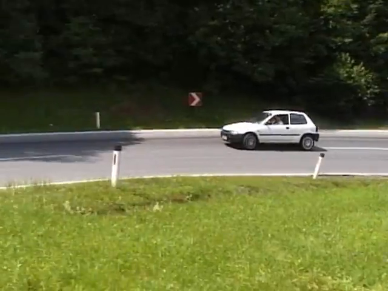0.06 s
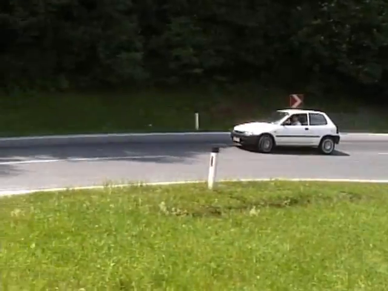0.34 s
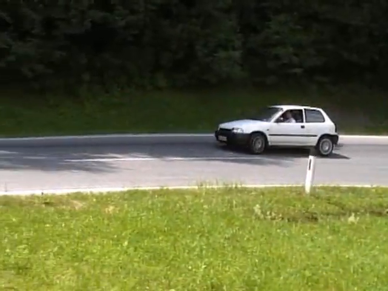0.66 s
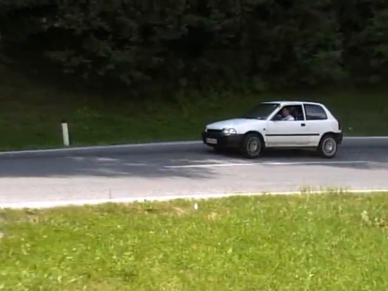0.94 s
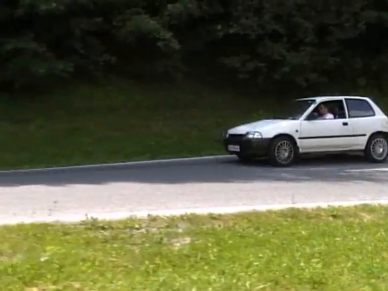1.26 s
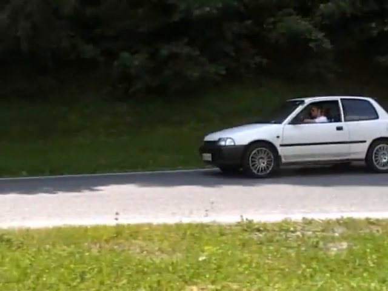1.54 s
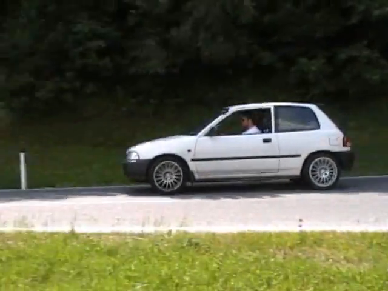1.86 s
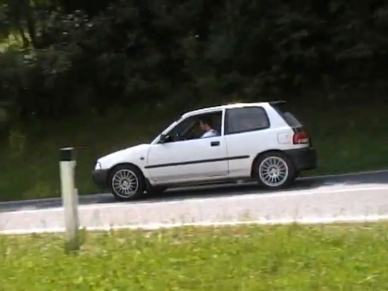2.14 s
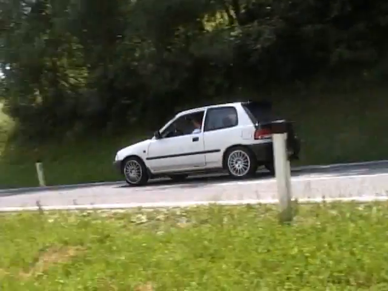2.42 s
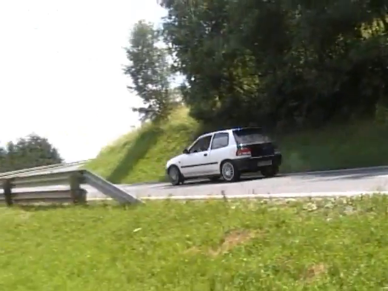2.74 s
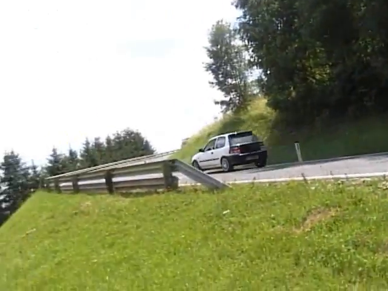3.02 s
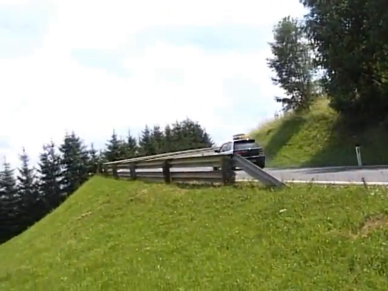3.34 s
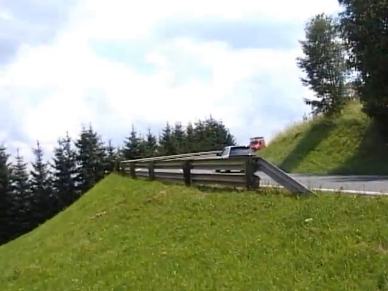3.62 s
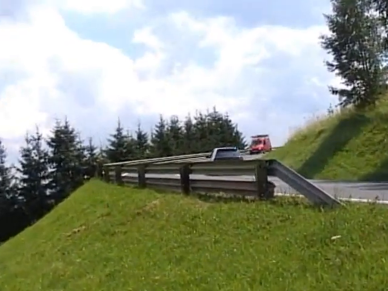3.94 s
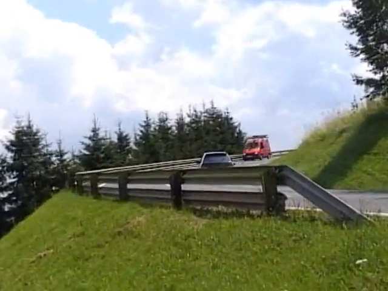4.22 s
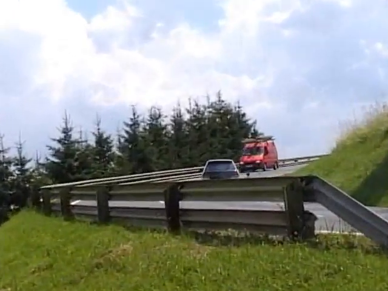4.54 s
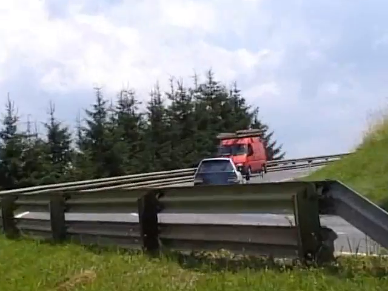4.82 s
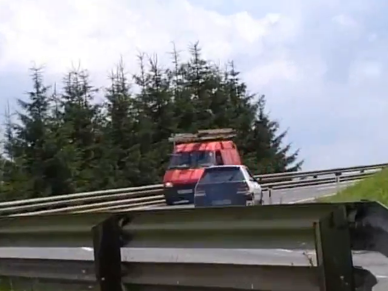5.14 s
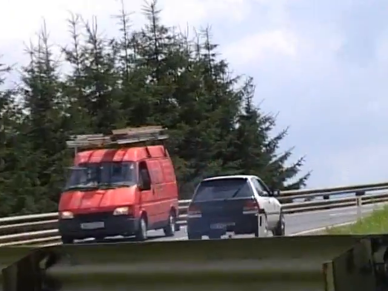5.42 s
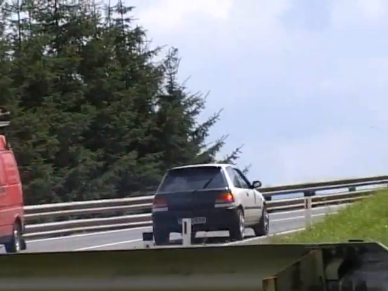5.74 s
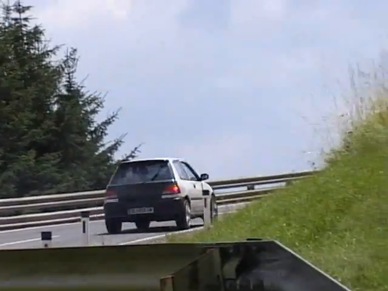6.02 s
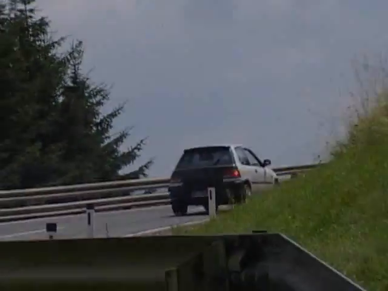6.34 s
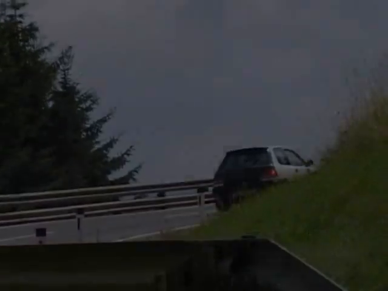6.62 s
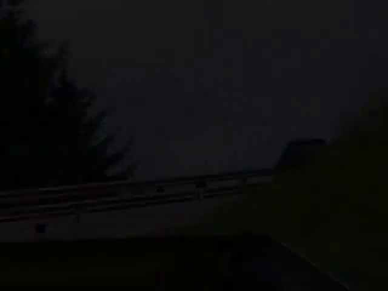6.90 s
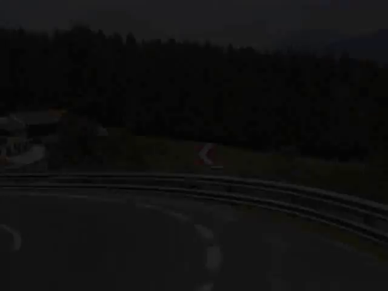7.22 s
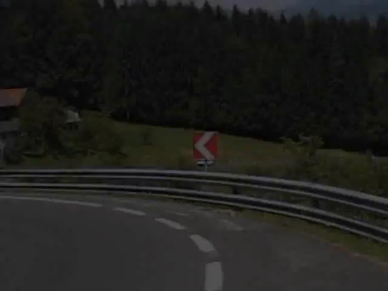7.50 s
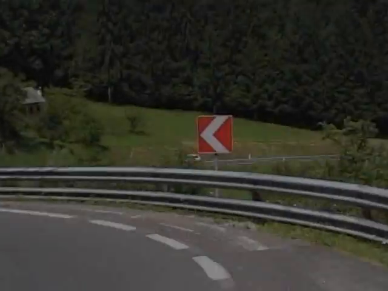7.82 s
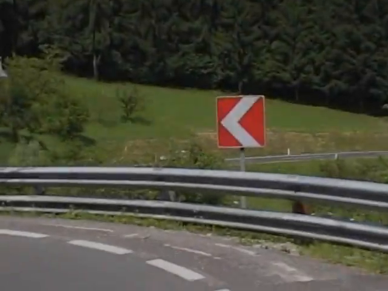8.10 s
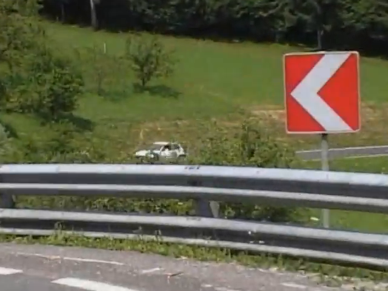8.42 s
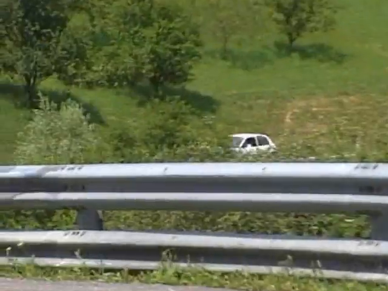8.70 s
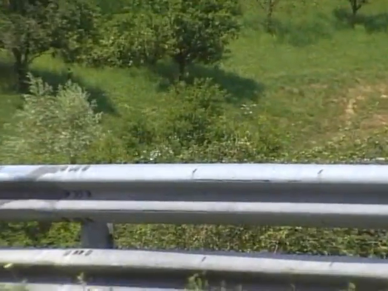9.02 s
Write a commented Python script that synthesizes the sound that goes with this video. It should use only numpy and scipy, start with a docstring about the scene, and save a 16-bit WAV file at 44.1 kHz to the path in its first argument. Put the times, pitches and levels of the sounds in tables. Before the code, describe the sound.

Tyres squeal, then a small car passes with a booming exhaust; wind buffets the microphone and distant traffic fades away.

```python
"""A small hatchback takes a mountain hairpin hard: its tyres stick and slip, squealing and spitting grit.
It pulls past uphill at 2.3 s, exhaust booming and tyres roaring; gusts buffet the microphone of a tape
camcorder, whose case ticks. Traffic drones higher up, the driver lifts off, and a van goes by at 5.5 s.
All fades out by 7.1 s and comes back on the quiet valley: faint chirps, an engine slowing far away.
Throughout, the camcorder's tape drive whines faintly and its hum filter combs the sound."""
import sys
import numpy as np
from scipy import signal
from scipy.fft import rfft, irfft, next_fast_len
from scipy.io import wavfile
from scipy.ndimage import uniform_filter1d, minimum_filter1d, map_coordinates

SR = 44100
rng = np.random.default_rng(int(sys.argv[2]) if len(sys.argv) > 2 else 0)


def unload_audio(sound):
    """Save the sound as a 16-bit wav file, at the path given as the first command line argument."""
    columns = np.transpose(np.atleast_2d(sound))
    # keep every value between -1 and 1, then stretch to whole-number steps
    steps = np.round(np.clip(columns, -1, 1) * 32767)
    wavfile.write(sys.argv[1], SR, steps.astype(np.int16))


N = 399546
T = np.arange(N) / SR


# slides of the loaded tyre, each ended by a moment of grip: (start [s], length [s], first pitch [Hz],
# last pitch [Hz], tone level [dB], octave level [dB], roughness [0-1])
TYRE_SLIDES = [(0, .04, 1133, 1137, -15.5, -26, 0.34), (0.048, 0.054, 1125, 1120, -17, -19, 0.6),
               (0.102, 0.043, 1135, 1085, -14.5, -21.5, 0.65),
               (0.148, 0.083, 1122, 1204, -15.5, -23.5, 0.4), (0.244, .04, 1161, 1143, -18.5, -30, 0.35),
               (0.286, 0.045, 1135, 1136, -13.5, -21.5, 0.6), (.365, 0.055, 1174, 1142, -20.5, -40, 0.1),
               (0.446, 0.025, 1112, 1093, -17, -25.5, 0.54), (0.495, .02, 1145, 1134, -17, -17.5, 0.85),
               (.517, 0.047, 1156, 1163, -12.5, -22, 0.3), (0.586, 0.034, 1164, 1172, -12.5, -22, .2),
               (0.644, .075, 1163, 1143, -13.5, -23.5, 0.23), (0.725, .082, 1127, 1132, -14, -23.5, 0.4),
               (.815, .075, 1144, 1128, -17, -20.5, 0.6), (.893, .087, 1140, 1143, -17.5, -22.5, 0.3),
               (0.985, 0.089, 1165, 1186, -16, -25, 0.33), (1.082, 0.045, 1177, 1192, -13, -26, 0.4),
               (1.14, 0.07, 1190, 1182, -20, -33.5, .45), (1.234, .078, 1252, 1230, -23.5, -42, 0.28)]
def slides():
    """Pitch, tone gain, octave gain and roughness: each slide bites, glides and dies as the tread grips."""
    attack_s, release_s = .008, .011
    points, tone_gain, octave_gain = [], 0, 0
    for start, length, first_hz, last_hz, tone_db, octave_db, rough in TYRE_SLIDES:
        points += [(start, first_hz, rough), (start + length, last_hz, rough)]
        attack = np.clip((T - start) / attack_s, 0, 1)
        envelope = attack * np.exp(-np.clip(T - start - length, 0, 1) / release_s)
        tone_gain = np.maximum(tone_gain, undb(tone_db) * envelope)
        octave_gain = np.maximum(octave_gain, undb(octave_db) * envelope)
    hz, rough = curves(sorted(points))
    return hz, tone_gain, octave_gain, rough


def stick_slip(hz, rough, jitter, jitter_rate, flutter_db):
    """Tread sticks and slips: a tone and its octave, shaken in pitch and level by the road's grain."""
    phase = turn(hz * (1 + rough * jitter * walk(jitter_rate) + 0.00447 * walk(69.8)))
    flutter = undb(flutter_db * (0.3 * walk(95) + rough * walk(280)))
    # tread blocks slip slightly out of step, which frays the octave most
    return [unit(flutter * (np.sin(k * phase) + 0.2 * k * rough * walk(330) * np.cos(k * phase)))
            for k in (1, 2)]


# how hard the tyres are pushed sideways: (time [s], load [dB])
CORNERING_LOAD = [(0, 4.5), (.08, 2), (.25, -4), (.32, -2), (.41, -14.5), (.52, 1), (.72, -8.5), (.86, 2.5),
                  (1.1, -8.5), (1.18, -12), (1.32, -21)]
# a more lightly loaded tyre joins in lower at the apex: (time [s], pitch [Hz], level [dB])
LIGHT_TYRE = [(.68, 1015, -50.5), (.79, 1023, -23), (.88, 1041, -26), (1, 1014, -36), (1.1, 1062, -32),
              (1.3, 1078, -50)]
# rubber scrubbing on asphalt: (frequency [Hz], density [dB])
SCRUB_SPECTRUM = [(500, -28.5), (800, -20), (1050, 8.5), (1500, -6.5), (2100, 2.5), (2700, -5),
                  (3400, -9.5), (4300, -19.5), (6000, -35.5)]
def squeal():
    """The loaded tyre sings and a second joins in; side load drives the judder and scrub beneath them."""
    hz, tone_gain, octave_gain, rough = slides()
    load_db, = curves(CORNERING_LOAD)
    # the note wavers and shudders as the tyre hops
    wavering_hz = hz * (1 + .008 * walk(60))
    tone, octave = stick_slip(wavering_hz, rough, jitter=.01, jitter_rate=330, flutter_db=2.6)
    low, low_octave = stick_slip(hz * .945, rough=0.718, jitter=0.05, jitter_rate=470, flutter_db=7.5)
    shudder = unit(undb(1.5 * walk(90)))
    singing = (tone_gain * tone + octave_gain * octave) * shudder
    judder = undb(-24.5 + load_db) * (low_octave + undb(-1.0) * low)
    light_hz, light_db = curves(LIGHT_TYRE)
    light_partials = stick_slip(light_hz, rough=.6, jitter=0.0394, jitter_rate=270, flutter_db=4.0)
    light_tyre = undb(light_db) * sum(light_partials)
    edge_tone, _ = stick_slip(hz * 1.075, rough=.6, jitter=0.023, jitter_rate=200, flutter_db=2.5)
    tread_edge = undb(-15.0) * tone_gain * edge_tone
    scrub = undb(-22 + 0.36 * load_db + 1.75 * walk(120)) * noise(SCRUB_SPECTRUM)
    release = np.interp(T, [1.3, 1.42], [1, 0])
    return hillside((singing + judder + light_tyre + tread_edge + scrub) * release, wet_db=-22, t60=.4)


# spits of grit where the squeal breaks off: (time [s], half width [s], level [dB])
GRIT_SPITS = [(.05, 0.049, -45), (.365, 0.037, -46.5), (.45, 0.016, -40.5), (.5, .03, -50.5)]
def grit():
    """Soft high hiss of grit thrown from the sliding tread."""
    spray = noise([(5500, -11), (7300, -0.5), (8500, -10), (12500, -15)])
    return spray * bursts(GRIT_SPITS) * undb(2 * walk(200))


# swells and dips of the boom, then of its octave: (time [s], half width [s], level change [dB])
BOOM_RIDES = [(.1, 0.073, 5), (.41, 0.088, -4), (.78, 0.075, -2), (1.87, 0.07, -16), (2.21, 0.14, 5),
              (2.53, 0.08, -9), (2.85, 0.17, 3.5), (3.22, 0.086, -5.5), (4.6, .45, 4)]
OCTAVE_RIDES = [(.25, 0.18, -9), (.54, 0.1, 11.5), (.98, 0.46, 8.5), (1.66, 0.35, 16.5), (1.93, .07, -7),
                (2.17, 0.074, 10)]
def exhaust_boom(firing):
    """Exhaust pulses make a clean boom at the firing rate and a weaker octave."""
    boom = undb(-23 + swells(BOOM_RIDES) + 0.54 * walk(13)) * unit(np.sin(firing))
    octave = undb(-37.5 + swells(OCTAVE_RIDES) + 1.6 * walk(12)) * unit(np.sin(2 * firing))
    return boom * passing(rear_db=2.0, falloff=0.91) + octave * passing(rear_db=2.0, falloff=0.7)


# resonances of the exhaust pipe: (frequency [Hz], gain [dB])
PIPE_RESPONSE = [(190, 4), (310, -17.5), (372, 0.5), (385, -5.5), (398, 2.5), (414, -6), (428, 2.5),
                 (470, -3), (520, -5), (545, -5), (578, 9), (600, -1), (614, -12), (624, 0.5), (655, 6),
                 (684, 4.5), (708, -5), (738, -0.5), (820, -8.5), (1400, -3)]
def exhaust_rasp(firing_hz, firing):
    """Overtones of the firing rate climb through the pipe's resonances."""
    rasp = 0
    for k in [1.5, *np.arange(2.5, 10.5, .5)]:
        pipe_db = np.interp(k * firing_hz, *np.transpose(PIPE_RESPONSE))
        uneven_db = -17 * (k % 1 > 0)  # unequal cylinders add weak half orders
        gain = undb(pipe_db + uneven_db + 1.3 * walk(22) + 1.3 * walk(7))
        rasp += gain * np.sin(k * firing + rng.uniform(0, 2 * np.pi) + 0.074 * k * walk(35))
    aim_db = swells([(4.85, 0.28, 5.4)])  # the tailpipe points back down the road
    return undb(-29.5 + aim_db) * unit(rasp) * passing(rear_db=1.0, falloff=0.85, late_s=.05)


# the revs climb, then drop: (time [s], firing rate [Hz])
ENGINE_REVS = [(0, 117.1), (1.14, 122.4), (1.7, 124.7), (2, 126.3), (2.28, 128.7), (2.85, 132),
               (4.56, 144.8), (5.12, 148), (5.55, 120)]
def engine():
    """Four cylinders pull until the driver lifts off at the next bend; gives sound and firing phase."""
    lift_s, lift_db_per_s = 5.12, 33
    firing_hz, = curves(ENGINE_REVS)
    firing = turn(firing_hz * (1 + 0.0029 * walk(40)))
    exhaust = exhaust_boom(firing) + exhaust_rasp(firing_hz, firing)
    throttle = undb(-lift_db_per_s * np.maximum(T - lift_s, 0))
    return pan(exhaust * throttle, left_db=0.55), firing


# the bright top layer of the rolling tyres: (frequency [Hz], density [dB])
HISS_SPECTRUM = [(600, -9), (1300, 9.5), (2200, 6.5), (3000, 5.5), (3750, 6.5), (4150, 0.5), (4850, 0),
                 (5300, -5), (8500, -4), (11500, -8), (14500, -18.5)]
def tyre_hiss(firing):
    """Tyre hiss throbs with the engine and is strongest and brightest close by."""
    hiss = wide(HISS_SPECTRUM, side_db=-20.0) * undb(-28 + .5 * walk(25.22))
    hiss *= passing(rear_db=-0.66, falloff=0.89) * (1 + 0.15 * np.sin(firing))
    sizzle = signal.sosfiltfilt(signal.butter(2, 9000, "high", fs=SR, output="sos"), hiss)
    spread = sizzle + undb(6.0) * (sizzle - sizzle[::-1])  # the top differs more between the capsules
    air_gain = undb(1.0) * passing(rear_db=1.5, falloff=0.53)  # the air takes the top first
    return hiss - sizzle + spread * air_gain


# the body of the rolling tyres: (frequency [Hz], density [dB])
ROAR_SPECTRUM = [(40, -26), (90, -12), (210, 3), (340, -2), (460, -8), (680, 1), (900, 0.5), (1250, -1.5),
                 (1580, 0), (1820, -3.5), (2100, -6), (3000, -13), (5000, -23), (9000, -42.5)]
def rolling_tyres(firing):
    """Tyre roar carries far, and a broad second swell comes with the passing van; a crest screens its treble
    and the hiss."""
    crest_hz = 1510
    pass_by = undb(-23) * passing(rear_db=1.17, falloff=0.89, late_s=0.28)
    van_roar = undb(-32.5) / np.hypot(1, (T - 5.15) / 1.34)
    roar = wide(ROAR_SPECTRUM, side_db=-20.0) * np.hypot(pass_by, van_roar) * undb(0.52 * walk(20))
    body = signal.sosfiltfilt(signal.butter(6, crest_hz, fs=SR, output="sos"), roar)
    treble = roar - body + tyre_hiss(firing)
    crest_db = np.interp(T, [2.9, 3.7, 5.2, 6.3], [0.5, -7.5, -7.0, -5.5])
    bank_db = -2.0 * np.maximum(T - 5.9, 0)  # the roar sinks behind the bank
    return body * undb(bank_db) + treble * undb(crest_db)


# two tread resonances that shift as the car turns: (time [s], centre [Hz], level [dB])
HIGH_GROOVE = [(1.4, 1199, -38), (2.3, 1151, -29.5), (2.72, 1163, -27), (3.2, 1080, -43), (3.8, 1130, -37),
               (4.4, 1116, -57), (5.1, 1119, -41.5), (5.6, 1178, -44), (6.1, 1038, -53), (7.1, 1100, -49)]
LOW_GROOVE = [(1.5, 781, -37.5), (2.1, 759, -35.5), (2.5, 770.6, -28), (2.95, 806, -33.5), (3.25, 748, -47),
              (4.4, 733, -52), (4.85, 788, -35.5), (5.6, 767.7, -37.5), (6.2, 781, -43.5), (7.1, 758, -48)]
def tread_ring():
    """Air pumped through the tread grooves rings, loudest just behind the car."""
    high_hz, high_db = curves(HIGH_GROOVE)
    low_hz, low_db = curves(LOW_GROOVE)
    high = undb(high_db) * resonance(high_hz, width_hz=230)
    return high + undb(low_db) * resonance(low_hz, width_hz=210)


# tyres of the oncoming van: (frequency [Hz], density [dB])
VAN_SPECTRUM = [(500, -4), (900, 5.5), (1250, 5.5), (1600, 5), (2100, -9.5), (3000, -29), (6000, -66.5)]
def van():
    """The van's tyres swell and fade as it comes through the gap in the bank."""
    nearness = 1 / (1 + ((T - 5.55) / 0.23) ** 2)
    return wide(VAN_SPECTRUM, side_db=-22.0) * undb(-26.5 + walk(14)) * nearness


# drone of the climbing traffic: (time [s], pitch [Hz], level [dB])
TRAFFIC_DRONE = [(4.5, 251.5, -34), (4.75, 248.2, -23), (5.08, 245.5, -27), (5.3, 245.6, -42),
                 (6, 246.2, -42.5), (6.5, 241.4, -41), (7.1, 237.3, -42)]
def uphill_traffic():
    """Engines further up the hill: a throbbing tone with a rougher one above it."""
    hz, db = curves(TRAFFIC_DRONE)
    tone = np.sin(turn(hz * (1 + .02 * walk(90)))) * undb(3 * walk(55))
    upper = undb(0.37 * db - 27.5) * resonance(hz * 1.43, width_hz=40)
    fade_in = np.clip(T - 4.4, 0, 1)
    return pan((undb(db) * unit(tone) + upper) * fade_in, left_db=-1)


# the breeze between gusts: (time [s], level [dB])
BREEZE_BED = [(1.6, -54), (2.75, -53), (3.3, -31), (4.4, -36.5), (5.85, -47), (6, -58), (6.3, -42),
              (7, -48)]
# strong gusts: (time [s], half width [s], level [dB])
GUST_HITS = [(2.901, 0.054, -31), (3.47, 0.076, -37.5), (3.71, 0.066, -40.5), (4.02, 0.022, -33),
             (4.32, 0.048, -35.5), (4.71, 0.017, -38), (5.62, 0.093, -35), (5.88, 0.051, -35)]
# wind rumble on the microphone: (frequency [Hz], density [dB])
WIND_SPECTRUM = [(25, -15), (50, -4), (90, 3), (140, 2.5), (220, -4), (400, -11), (600, -14), (1000, -35),
                 (2500, -40)]
def wind():
    """Gusts over an uneven breeze buffet the microphone ports, mostly out of step, the left harder."""
    breeze_db, = curves(BREEZE_BED)
    force = undb(breeze_db + 2.8 * walk(8.8)) + bursts(GUST_HITS)
    common, opposed = (noise(WIND_SPECTRUM) * undb(2.0 * walk(28)) for _ in range(2))
    ports = common + 2 * opposed * np.array([[1], [-1]])
    return pan(ports, left_db=5.0) * force


# ticks of the case: (time [s], dry crack [dB], bright ring [dB], dull knock [dB])
TICK_HITS = [(2.566, -18.5, -45, -45), (2.595, -15, -40, -38), (3.1348, -33, -28, -42),
             (3.1363, -29, -22, -42), (3.314, -27, -45, -28), (3.4856, -30, -35, -29),
             (5.6672, -31, -18.5, -28), (6.4, -41, -52, -36), (7.094, -56, -55.5, -54.5),
             (8.58, -35, -43, -33), (8.8972, -33, -41, -25), (8.9762, -19, -30, -16),
             (8.978, -26, -34, -21.5), (8.983, -33, -41, -24.5)]
# the three layers of a tick: (frequency [Hz], density [dB])
CRACK_SPECTRUM = [(2000, 0), (6000, -2), (11000, -1.5), (14500, -11)]
RING_SPECTRUM = [(3000, -11), (5000, -9), (7400, -17), (9000, 2), (10000, -20), (11000, -2.5), (12500, -25)]
KNOCK_SPECTRUM = [(120, -36), (260, -12), (420, 7), (600, -9), (850, 8), (1300, -5), (2100, 3.5),
                  (3000, -8.5), (3800, 0), (4700, -15), (5700, -1.5), (7500, -25)]
def case_ticks():
    """Dry ticks in the camcorder's case, each a burst that dies in a few milliseconds."""
    crack, ring, knock = noise(CRACK_SPECTRUM), noise(RING_SPECTRUM), noise(KNOCK_SPECTRUM)
    ticks = np.zeros(N)
    age = T[:2000]
    attack = 1 - np.exp(-age / 0.00032)
    for start, crack_db, ring_db, knock_db in TICK_HITS:
        span = slice(int(start * SR), int(start * SR) + len(age))
        ticks[span] += attack * (undb(crack_db) * crack[span] * np.exp(-age / 0.0011)
                                 + undb(ring_db) * ring[span] * np.exp(-age / 0.0024)
                                 + undb(knock_db) * knock[span] * np.exp(-age / 0.0021))
    return pan(ticks, left_db=-7.0)


def bump():
    """A soft hollow bump near the microphone."""
    hollow = np.sin(turn(520 * (1 + 0.048 * walk(150))))
    return pan(hollow * bursts([(3.325, 0.01, -25.5)]), left_db=10)


def far_engine():
    """The low orders of a distant engine that picks up a little, then runs down."""
    shaft_hz = np.interp(T, [7.2, 7.8, 8.2, 9], [16.0, 20.0, 19.5, 15.5])
    phase = turn(shaft_hz * (1 + 0.0062 * walk(25)))
    return undb(-48.5) * unit(sum(undb(2 * walk(11)) * np.sin(k * phase) for k in (4, 5, 6)))


# squeaks, about eight a second: (time [s], level [dB])
CHIRP_HITS = [(7.29, -43), (7.4, -46), (7.51, -47), (7.607, -41), (7.725, -46), (7.838, -44), (7.95, -50),
              (8.07, -44), (8.19, -48), (8.31, -49), (8.44, -46), (8.57, -48)]
def far_chirps():
    """A far squeak, perhaps of tyres: short uneven pulses of one wavering tone."""
    tone = unit(np.sin(turn(1740 * (1 + .03 * walk(350)))))
    return tone * bursts([(time, .016, db) for time, db in CHIRP_HITS])


# the far road's swell: (time [s], level [dB])
ROAD_BED = [(7.2, -37), (8, -41), (8.4, -40.5), (9.05, -42)]
# its colour across the valley: (frequency [Hz], density [dB])
VALLEY_SPECTRUM = [(55, -6), (80, -2), (140, -8), (180, -5), (310, -7), (450, -3), (660, -6.5), (900, -9),
                   (1750, -9.5), (2400, -14.5), (4300, -28), (9000, -58), (13000, -69.5)]
def valley():
    """A bed of far road noise under an engine, chirps, an approaching car and a low hum that dies away."""
    road_db, = curves(ROAD_BED)
    motor, chirps = far_engine(), far_chirps()
    road = wide(VALLEY_SPECTRUM, side_db=-9.0) * undb(road_db + 0.24 * walk(36))
    approach_db = np.interp(T, [8, 8.7], [-58, -45.5])  # the car clears the bushes
    approach = noise([(560, -5), (680, 5.0), (850, -3)]) * undb(approach_db)
    hum = resonance(np.interp(T, [7.3, 7.55], [238, 220]), width_hz=15) * bursts([(7.4, 0.41, -42.5)])
    return pan(road + hum + motor + chirps + approach, left_db=-1.5)


# partials of the tape drive: (frequency [Hz], level [dB])
WHINE_PARTIALS = [(6379, -70), (6961, -66), (9367, -83), (10271, -67.5)]
def tape_drive():
    """Thin wavering whine and faint hiss of the camcorder itself."""
    whine = sum(undb(db) * unit(np.sin(turn(hz * (1 + 0.013 * walk(400))))) for hz, db in WHINE_PARTIALS)
    hiss = wide([(3000, -3.0), (7000, -5.0), (10500, -6.5), (12000, -10.0), (14000, -24.0)], side_db=-2.0)
    return whine + undb(-55.0) * hiss


def passing(rear_db, falloff, late_s=0):
    """Pass-by gain: falls with distance, shifts by rear_db behind the car and the opposite in front."""
    pass_s, speed_m_s, nearest_m = 2.266, 15, 7.13
    along = speed_m_s * (T - pass_s - late_s)
    distance = np.hypot(along, nearest_m)
    return (nearest_m / distance) ** falloff * undb(rear_db * along / distance)


def hillside(x, wet_db, t60):
    """Trees and banks scatter a late, dull tail, different for each channel."""
    t = T[:SR]
    tail = rng.standard_normal((2, SR)) * undb(-60 * t / t60) * (t > .012)
    tail = signal.sosfilt(signal.butter(1, 2500, fs=SR, output="sos"), tail)
    tail /= np.sqrt(np.sum(tail ** 2, axis=1, keepdims=True))
    mid = tail.mean(axis=0)
    tail = mid + 0.86 * (tail - mid)  # close ports narrow the image
    return x + undb(wet_db) * signal.fftconvolve(x[None], tail, axes=1)[:, :N]


def undb(db):
    """Decibels to gain."""
    return 10 ** (np.asarray(db) / 20)


def unit(x):
    """Scale to rms 1."""
    return x / np.sqrt(np.mean(x ** 2))


def curves(rows):
    """Each column of a table, joined by straight lines in time."""
    times, *columns = np.transpose(rows)
    return [np.interp(T, times, column) for column in columns]


def swells(rows):
    """Sum of bell curves, each (time [s], half width [s], height)."""
    return sum(height * np.exp(-((T - time) / width) ** 2) for time, width, height in rows)


def bursts(rows):
    """Gain envelope of bell curves, each (time [s], half width [s], level [dB])."""
    return swells([(time, width, undb(db)) for time, width, db in rows])


def walk(rate):
    """Smooth random motion of rms 1 that changes rate times a second."""
    return unit(map_coordinates(rng.standard_normal(8192), [T * rate], order=2, mode="wrap"))


def turn(hz):
    """Phase of a moving frequency."""
    return 2 * np.pi * np.cumsum(hz) / SR


def noise(spectrum):
    """Unit noise shaped by (frequency [Hz], density [dB]) points, rolling off beyond the ends."""
    size = next_fast_len(N, real=True)
    f = np.maximum(np.fft.rfftfreq(size, 1 / SR), 1)
    hz, db = np.transpose(spectrum)
    rolloff = np.minimum(1, np.minimum(f / hz[0], hz[-1] / f)) ** 2
    gain = undb(np.interp(np.log(f), np.log(hz), db)) * rolloff
    return unit(irfft(rfft(rng.standard_normal(size)) * gain, size)[:N])


def resonance(hz, width_hz):
    """Unit noise in one resonance whose centre may move."""
    phase = turn(hz)
    return unit(walk(width_hz) * np.sin(phase) + walk(width_hz) * np.cos(phase))


def wide(spectrum, side_db):
    """Stereo noise: a common part and a weaker opposed part."""
    return noise(spectrum) + undb(side_db) * noise(spectrum) * np.array([[1], [-1]])


def pan(x, left_db):
    """Place a sound with the left channel left_db above the right."""
    return x * undb(np.array([[left_db], [-left_db]]) / 2)


def scene():
    """The bend, a fade through near silence, then the valley; ticks and bump stay outside the fade."""
    valley_s = 7.143
    exhaust, firing = engine()
    bend = squeal() + grit() + exhaust + uphill_traffic() + rolling_tyres(firing) + tread_ring()
    bend = bend + van() + wind()
    outdoors = np.where(T < valley_s, bend, valley())
    fade = np.interp(T, [6.05, valley_s, 7.3, 8.2], [0.96, 0.02, 0.11, 0.73])
    dip = np.clip(np.abs(T - valley_s) / .03, .1, 1)
    return (outdoors + tape_drive()) * fade * dip + case_ticks() + bump()


def hum_filter(x, drum_hz, memory, depth):
    """Subtract a running mean of past head-drum turns: a notch at every multiple of the drum rate."""
    period = round(SR / drum_hz)
    turns = np.pad(x, ((0, 0), (0, -N % period))).reshape(2, -1, period)
    hum = signal.lfilter([0, 1 - memory], [1, -memory], turns, axis=1)
    return x - depth * hum.reshape(2, -1)[:, :N]


def limiter(x, ceiling_db, reaction_s):
    """Turn the gain down smoothly around each peak that passes the ceiling."""
    window = int(reaction_s * SR)
    gain = undb(ceiling_db) / np.maximum(np.abs(x).max(axis=0), undb(ceiling_db))
    return x * uniform_filter1d(minimum_filter1d(gain, window), window)


# bass roll-off of the capsules: (left corner [Hz], right corner [Hz])
LOW_CUT_HZ = [10, 42]
def record(dry):
    """Two capsules, the right thinner in the bass, feed the hum filter, the limiter and a high cut."""
    high_cut_hz = 14600
    capsules = np.array([signal.sosfilt(signal.butter(1, hz, "high", fs=SR, output="sos"), channel)
                         for channel, hz in zip(dry, LOW_CUT_HZ)])
    combed = hum_filter(capsules, drum_hz=150, memory=0.53, depth=0.92)
    limited = limiter(combed, ceiling_db=-1.5, reaction_s=.003)
    return signal.sosfilt(signal.ellip(8, .2, 80, high_cut_hz, fs=SR, output="sos"), limited)


dry = scene()
out = record(dry)
unload_audio(out)
```